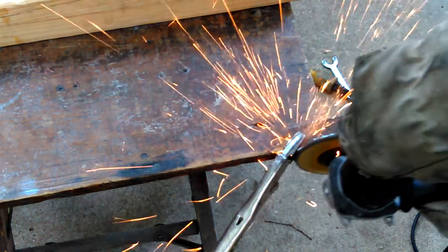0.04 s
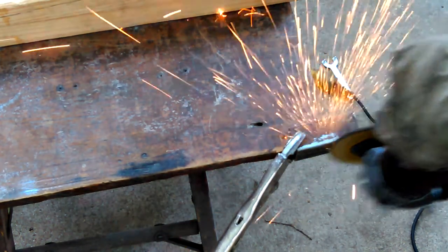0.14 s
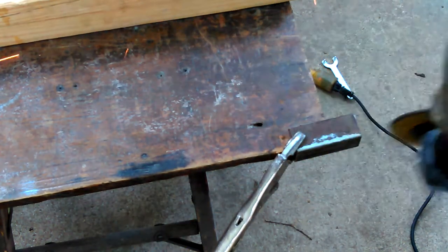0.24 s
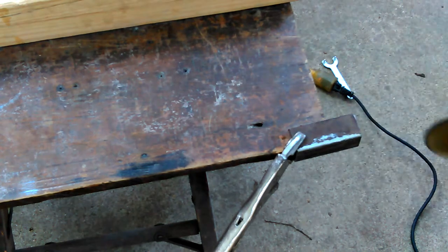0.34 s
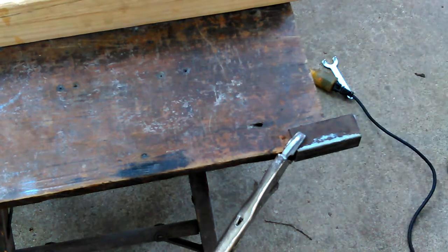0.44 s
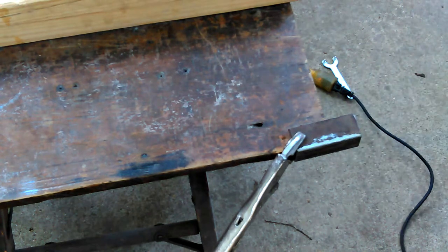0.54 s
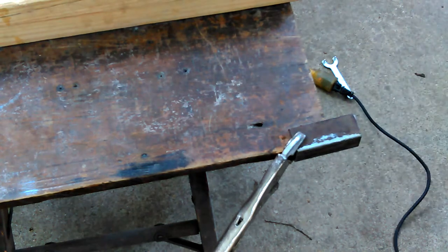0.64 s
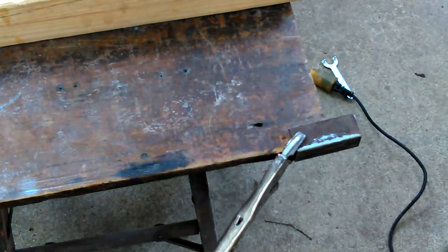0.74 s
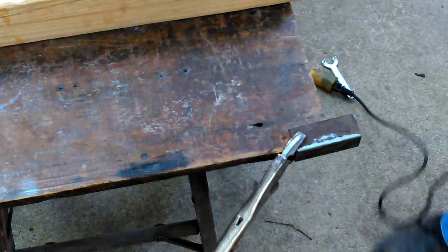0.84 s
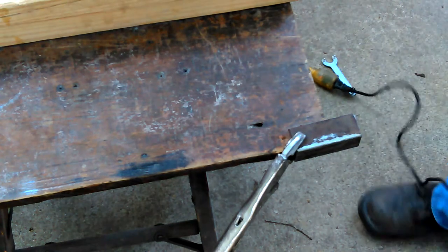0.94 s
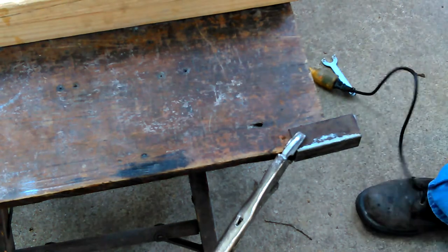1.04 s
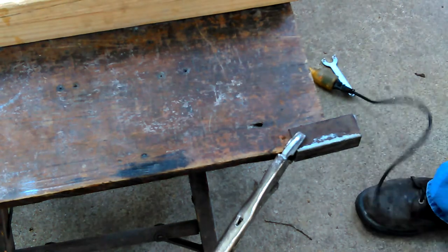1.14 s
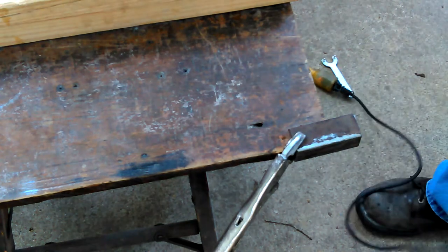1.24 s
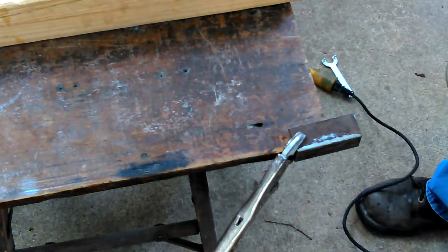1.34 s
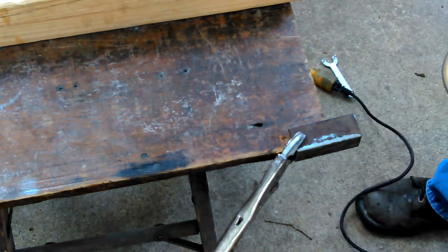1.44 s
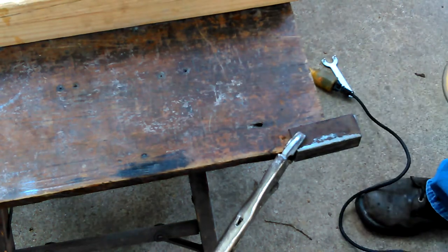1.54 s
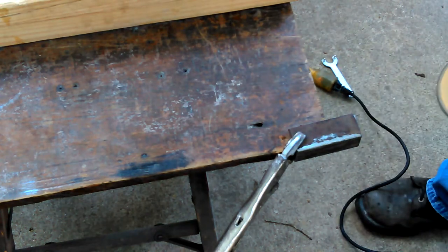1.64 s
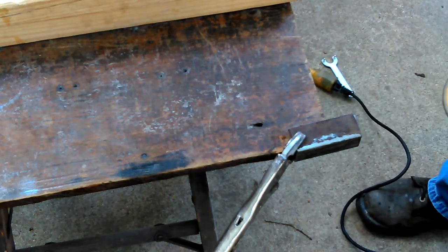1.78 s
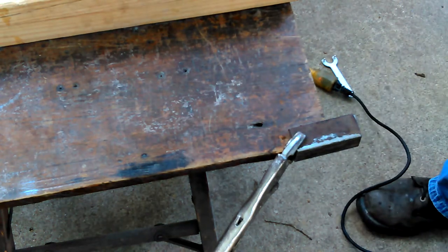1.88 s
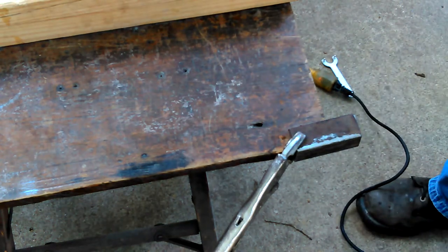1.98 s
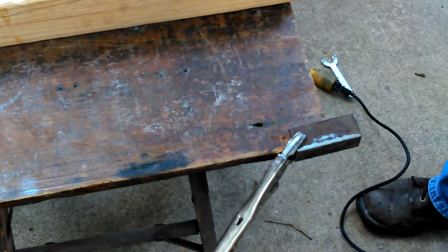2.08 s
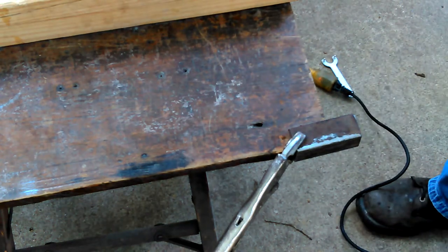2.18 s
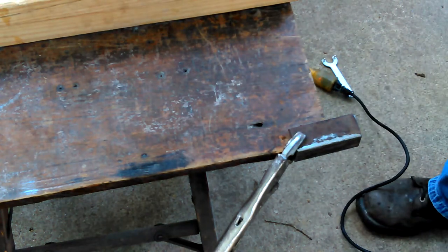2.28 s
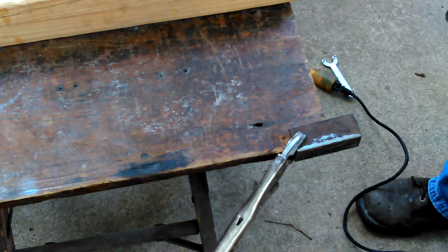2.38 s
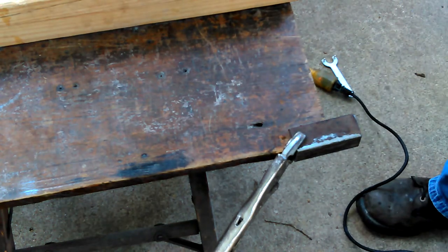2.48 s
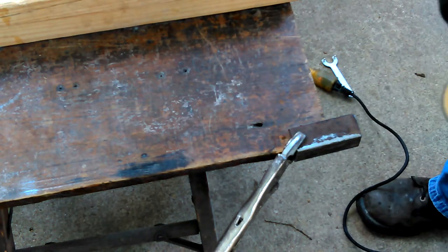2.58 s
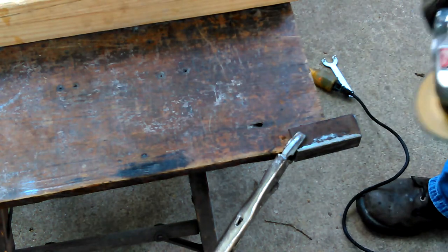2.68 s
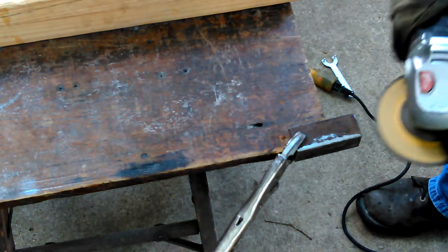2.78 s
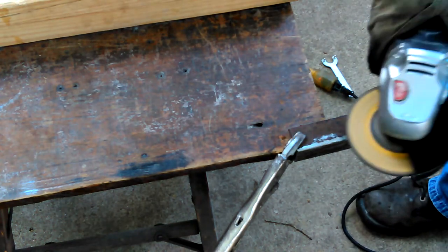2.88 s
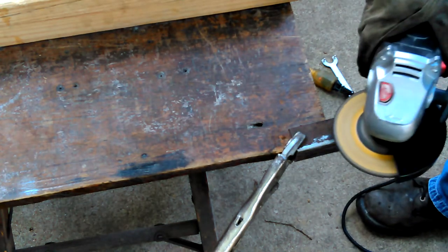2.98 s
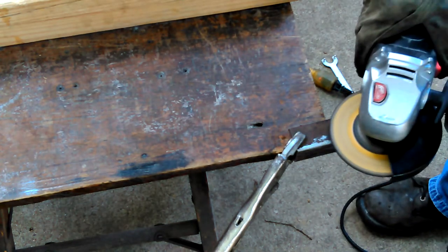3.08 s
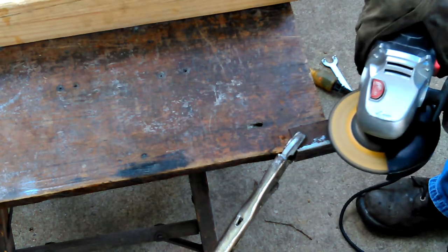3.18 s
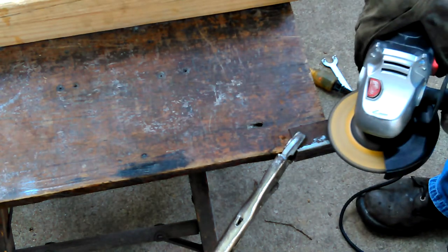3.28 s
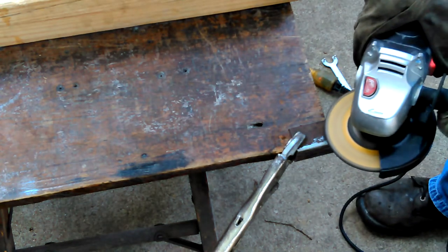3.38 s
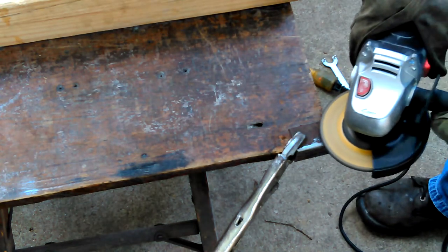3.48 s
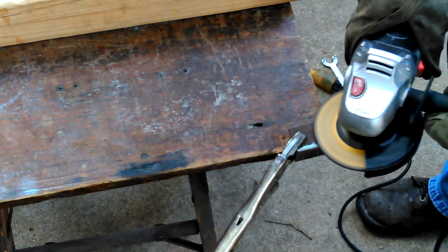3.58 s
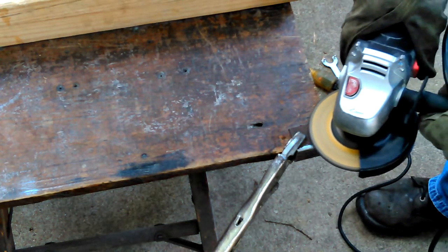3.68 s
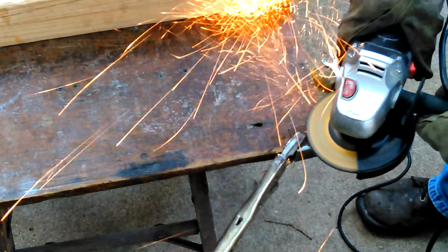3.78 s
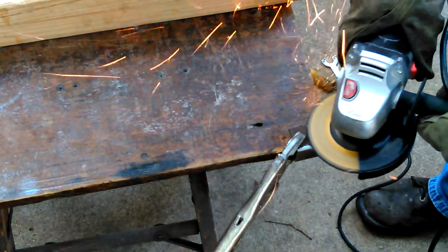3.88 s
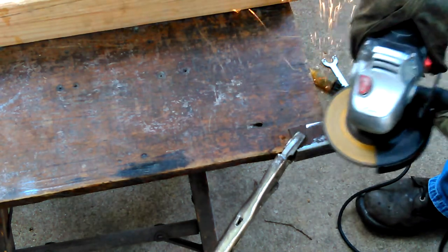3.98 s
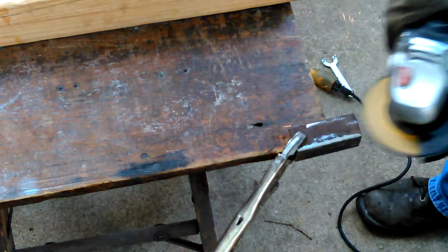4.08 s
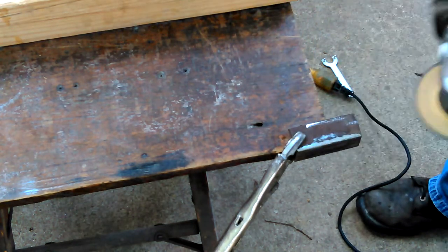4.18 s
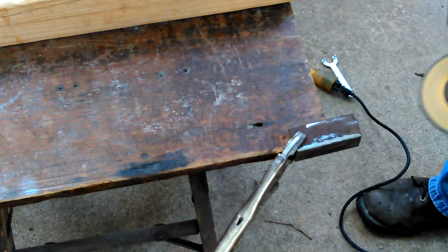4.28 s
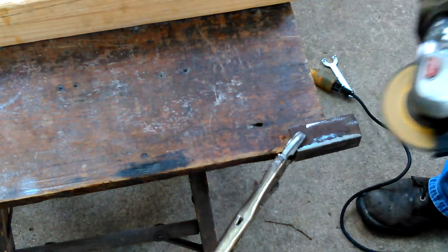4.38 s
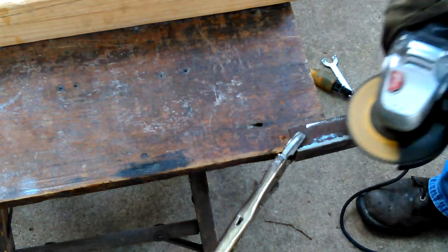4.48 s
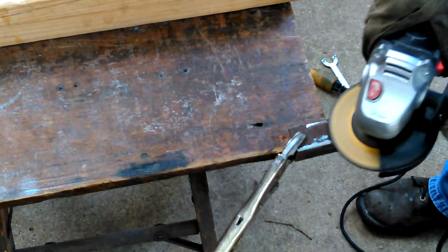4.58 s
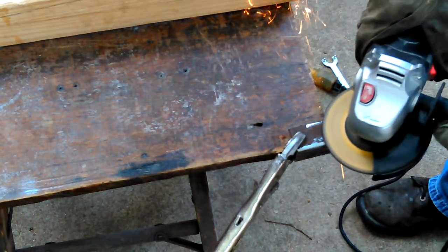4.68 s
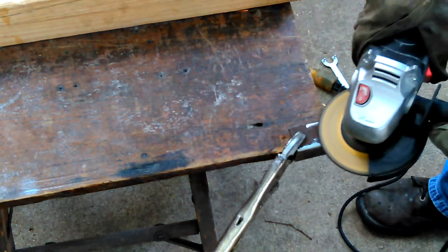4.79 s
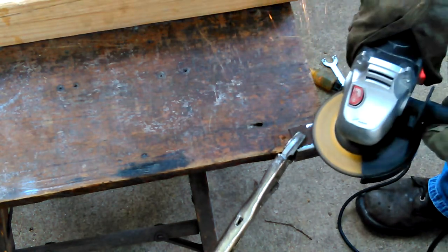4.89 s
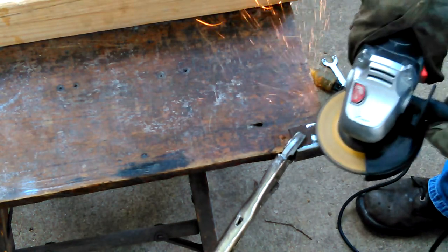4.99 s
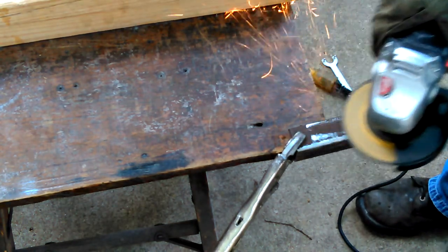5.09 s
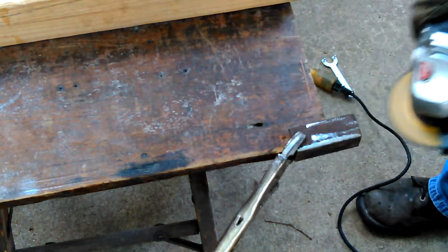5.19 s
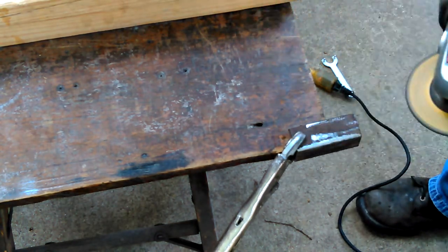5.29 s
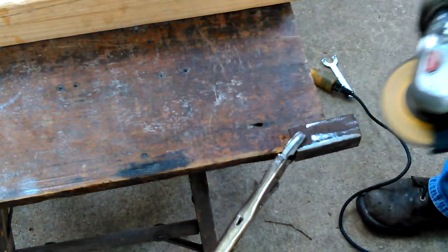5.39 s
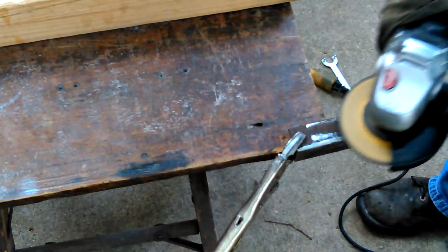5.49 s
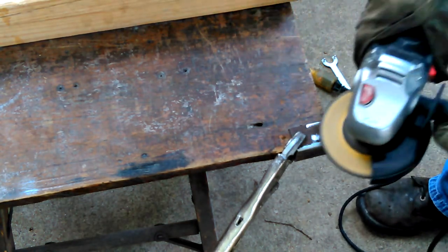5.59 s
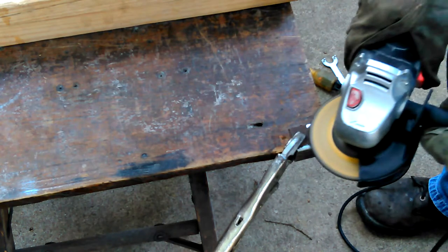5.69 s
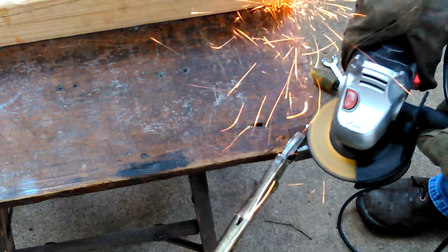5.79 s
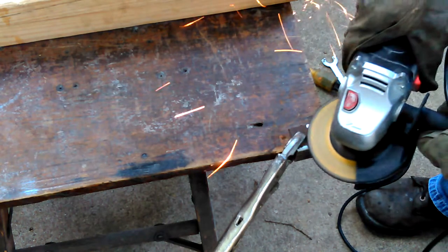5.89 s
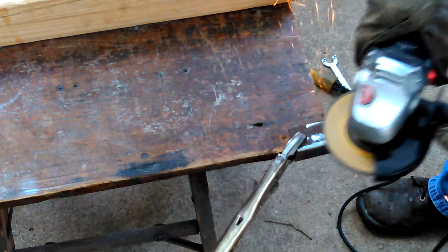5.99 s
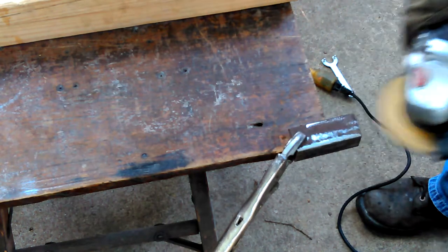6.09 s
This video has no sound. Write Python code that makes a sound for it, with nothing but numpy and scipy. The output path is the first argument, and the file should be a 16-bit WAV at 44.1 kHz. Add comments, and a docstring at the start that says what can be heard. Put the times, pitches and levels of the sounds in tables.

```python
"""Outdoors, beside a steel bench, an angle grinder whines and its fan hisses as its disc grinds a clamped bar.
At 1.3 s the switch is let go for a second: the gears coast and rattle, then the motor winds up again.
From 3.6 s the disc grinds the bar three more times; repeating grit and loose noise ring the bar's modes, some squeal.
Wind, in low noise and damped thumps, puffs on the microphone in this second half; a far engine hums throughout.
A patchy treble noise, opposite in left and right, fades under loud grinding; all else is central."""
import sys
import numpy as np
from scipy import signal
from scipy.fft import irfft
from scipy.io import wavfile

SR = 44100
rng = np.random.default_rng(int(sys.argv[2]) if len(sys.argv) > 2 else 0)


def wav_out(sig):
    """Save sig, one row per channel (or a flat mono array), as 16-bit PCM at SR to the path in sys.argv[1]."""
    wavfile.write(sys.argv[1], SR, np.round(np.clip(np.atleast_2d(sig).T, -1, 1) * 32767).astype(np.int16))


N = 270774

# level and shading of the fan hiss, and level of the whine, as the tool is turned about:
# time_s, hiss_db, boom_db (under 1.1 kHz, none over 1.6), body_db (under 2.3 kHz, none over 4.5),
# edge_db (over 9.2 kHz, none under 6.5), whine_db
TOOL_TURNED = [(0.1, -15, 1.5, -7, 4, -44.5), (0.32, -18, 0.5, -4.5, -3.5, -47),
               (0.55, -17.5, 1.5, -5.5, -3.5, -38), (0.75, -17.5, -4.5, -2, -2, -40.5),
               (1.03, -12.5, -3.5, -3.5, -2, -41), (1.43, -12, -5.5, -4, -3, -39),
               (1.89, -19.5, -5.5, -1, 1, -36), (2.05, -21.5, -4.5, 0, 2.5, -38),
               (2.4, -21, -2.5, -3, -0.5, -43), (2.7, -20, -5.5, -1, -3, -36.5),
               (2.89, -17, -2, -4, -2, -41), (3.08, -16.5, -4.5, -3.5, -2.5, -45),
               (3.55, -18, -2.5, -2, 0, -42), (4.2, -17, -3, -2, -4, -41.5), (4.65, -17, -4, -1.5, -1, -40),
               (5.25, -17.5, -4.5, -1.5, -3, -41.5), (6.14, -15.5, -3.5, -2.5, 0.5, -39.5)]
# colour of the hiss and of the patchy treble, relative levels: pitch_hz, level_db_per_hz
NOISE_COLOUR = [(350, -18.5), (600, -12), (703, -12), (761, -15.5), (1400, -6.5), (1520, -8.5), (2340, -7),
                (2860, -6.5), (3100, -7), (4790, -5), (6670, -4.5), (9160, -19.5), (14200, -24)]
# disc on bar, one table a pass from touch to lift:
# time_s, pressure_db, lean_to_low_modes_db, ring_near_7_khz_db
PASSES = [
    [(0.0, -13, 4, -9), (0.06, -16, 1, -6), (.11, -7, 2.5, -7), (0.15, 2, -2, -3), (0.22, -3, 2.5, 2.5),
     (0.274, 3, -0.5, 4.5), (0.287, -13, 4, -7)],
    [(3.595, -3, -3, -3), (3.66, 0, -2.5, -4.5), (3.8, 4, -6.5, -2), (3.88, 4.5, -4, 1.5),
     (4.01, 7, -2.5, 0.5), (4.07, 1, 4.5, 3.5), (4.145, 1.5, 3, 0.5), (4.158, -25, 0, -6)],
    [(4.69, 0, 2, 2.5), (4.76, -6.5, 1.7, 8), (4.85, -0.5, 2, -5), (4.96, 3, 1, -0.5), (5.05, 3.5, 0, 0),
     (5.1, 1.5, 1.5, 8.5), (5.18, 2, 4, -2), (5.2, -6, 6, -3)],
    [(5.795, -5, 1.5, -12), (5.9, -1.5, -1, -6), (5.96, -2, -7, -12), (6.03, 1.5, 1, -3), (6.08, 5, 0, -3),
     (6.14, 0, 1, -4)],
]
SWITCH_OFF_S, SWITCH_ON_S = 1.3, 2.39
DISC_PER_ARMATURE = 12 / 37   # gear ratio, twelve pinion teeth


def amp(db):
    """dB to gain."""
    return 10 ** (np.asarray(db) / 20)


def rms_one(x):
    """Scale to rms 1."""
    return x / np.sqrt(np.mean(x ** 2) + 1e-20)


def in_time(rows, outside=None):
    """Columns of a curve table at every sample; outside is the value beyond its ends."""
    time_s, *columns = np.transpose(rows)
    t = np.arange(N) / SR
    return [np.interp(t, time_s, column, outside, outside) for column in columns]


def drift(rate_hz):
    """Slow random wander of spread 1: noise smoothed by two equal poles, drawn every 40 samples."""
    pole = np.exp(-2 * np.pi * rate_hz * 40 / SR)
    white = rng.standard_normal(N // 40 + 2002)
    slow = signal.lfilter([1], [1, -2 * pole, pole * pole], white)[2000:]   # settled part
    return np.interp(np.arange(N) / 40, np.arange(len(slow)), rms_one(slow))


def resonate(x, modes):
    """Parallel resonances with alternating signs, together scaled to rms 1."""
    out = 0
    for k, (hz, width_hz, db) in enumerate(modes):
        r = np.exp(-np.pi * width_hz / SR)
        poles = [1, -2 * r * np.cos(2 * np.pi * hz / SR), r * r]
        out = out + (-1) ** k * amp(db) * signal.lfilter([1 - r * r, 0, r * r - 1], poles, x)
    return rms_one(out)


def coloured(spectrum, edges_hz, patchy_db, tilt, shared=0.61, rate_hz=12):
    """Noise in bands, each with its own level, flicker and moving tilt(hz) in dB."""
    out, power = 0, 0
    white = rng.standard_normal((2, N))
    together = drift(31)
    points_hz, points_db = np.transpose(spectrum)
    for k, (low, high) in enumerate(zip(edges_hz, edges_hz[1:])):
        sos = signal.butter(2, [low, high], "band", fs=SR, output="sos")
        band = signal.sosfilt(sos, white[k % 2])
        hz = np.sqrt(low * high)
        level = amp(np.interp(np.log(hz), np.log(points_hz), points_db))
        power += np.mean((level * band) ** 2)
        flicker_db = patchy_db * (shared * together + drift(rate_hz))
        out = out + level * band * amp(tilt(hz) + flicker_db)
    return out / np.sqrt(power)   # near rms 1 but for tilt and flicker


def speed():
    """Armature speed in Hz: it climbs toward free speed, passes drag it down, it coasts with the switch off."""
    free_hz, start_hz = 550.8, 537.8
    wind_up_s, coast_s = .48, 3.15   # time constants
    # load of each pass, growing from touch to lift: drag_at_touch_hz_per_s, drag_at_lift_hz_per_s
    drags = [(94.97, 135), (19.97, 100), (8.01, 150), (7.94, 55.3)]
    step_s = .002
    t = np.arange(0, N / SR + step_s, step_s)
    drag = 0
    for rows, (at_touch, at_lift) in zip(PASSES, drags):
        start_s, end_s = rows[0][0], rows[-1][0]
        done = (t - start_s) / (end_s - start_s)
        drag = drag + (at_touch + (at_lift - at_touch) * done ** 2) * (t >= start_s) * (t < end_s)
    hz = [start_hz]
    for s, pull in zip(t[1:], drag):
        if SWITCH_OFF_S < s < SWITCH_ON_S:
            change = -hz[-1] / coast_s
        else:
            change = (free_hz - hz[-1]) / wind_up_s - pull
        hz.append(hz[-1] + step_s * change)
    return np.interp(np.arange(N) / SR, t, hz)


def motor(turns):
    """Armature unbalance gives one tone, pinion teeth a wavering twelfth multiple, the disc a hum."""
    # tone of the twelve pinion teeth, heard as the drive lets go: time_s, level_db
    mesh = [(1.2, -60), (1.35, -29), (1.6, -27.5), (1.9, -36), (2.05, -60)]
    # hum of the disc at four times its speed: time_s, level_db
    disc_hum = [(0, -55), (.3, -48.5), (.9, -43), (1.2, -59), (1.4, -52), (6.14, -75)]
    whine_db = in_time(TOOL_TURNED)[-1] + 2.25 * drift(23)
    whine = amp(whine_db) * np.sin(2 * np.pi * turns)
    mesh_db = in_time(mesh, outside=-120)[0] + 5.7 * drift(39.0)
    teeth = amp(mesh_db) * np.sin(2 * np.pi * 12 * turns + 1.6 * drift(57))
    disc_db = in_time(disc_hum)[0] + 2.5 * drift(5)
    disc = amp(disc_db) * np.sin(2 * np.pi * 4 * DISC_PER_ARMATURE * turns)
    return np.sqrt(2) * (whine + teeth + disc)   # table levels are rms


def shading(hz):
    """Moving level in dB at one pitch as the tool is turned: low, middle and high parts differ."""
    _, boom_db, body_db, edge_db, _ = in_time(TOOL_TURNED)
    boom = boom_db * np.clip(2 * np.log2(1600 / hz), 0, 1)
    body = body_db * np.clip(np.log2(4500 / hz), 0, 1)
    edge = edge_db * np.clip(2 * np.log2(hz / 6500), 0, 1)
    return boom + body + edge


def hiss():
    """Air through the vents; the housing shades low and high parts differently as it turns."""
    air = coloured(NOISE_COLOUR, np.geomspace(300, 15000, 21), patchy_db=1.0, tilt=shading)
    return amp(in_time(TOOL_TURNED)[0]) * air


def patchy_treble(fading):
    """Strongly flickering treble noise, opposite in left and right, that follows the level of the hiss."""
    lower_edge_hz, level_db = 4730, -13.5   # level is over the hiss

    def tilt(hz):
        return shading(hz) + 4.1 * np.log2(hz / 6000)

    noise = coloured(NOISE_COLOUR, np.geomspace(4000, 15000, 8), patchy_db=7.0, tilt=tilt,
                     shared=0.79, rate_hz=7.0)
    highpass = signal.cheby2(8, 60, 0.91 * lower_edge_hz, "high", fs=SR, output="sos")
    treble = amp(level_db) * fading * signal.sosfilt(highpass, noise)
    return amp(in_time(TOOL_TURNED)[0]) * treble * [[1], [-1]]


def rattle():
    """Clumped knocks of tooth on tooth ring the gear housing while the drive has play."""
    # coasting rattle, lowest housing mode then upper modes: jolt_at_let_go_db, steady_db, fade_db_per_s
    levels = [(-34, -26, 4), (-21, -21, 3.5)]
    # housing modes in the same two groups, relative levels: pitch_hz, width_hz, level_db
    gearbox = [
        [(1945, 63, 11), (1860, 160, -11)],
        [(2750, 240, 1.5), (3220, 72, 12), (3550, 43, 11), (4840, 87, 7), (5500, 900, 2.5), (6100, 220, -10)],
    ]
    jolt_s, take_up_s = 0.022, 0.052   # the jolt dies, the drive takes up the play again
    sizes = amp(4.1 * np.minimum(rng.exponential(1, N), 5)) * rng.choice([-1, 1], N)
    knocks_per_s = 3000 * amp(3 * drift(80))
    knocks = sizes * (rng.random(N) < knocks_per_s / SR) + 1e-18
    t = np.arange(N) / SR
    since = t - SWITCH_OFF_S
    loosening = np.clip(since / take_up_s, 0, 1)
    loose = loosening * np.exp(-np.maximum(t - SWITCH_ON_S, 0) / take_up_s)
    jolt = np.exp(-np.abs(since - take_up_s) / jolt_s)
    out = 0
    for (jolt_db, steady_db, fade_db), modes in zip(levels, gearbox):
        level = amp(jolt_db) * jolt + amp(steady_db - fade_db * since)
        out = out + level * resonate(knocks, modes)
    return loose * out


def contact():
    """Gain of each group of bar modes; the touch comes and goes over some ms."""
    # each group of bar modes: level_db at 0 dB controls, then the dB it follows
    # per_db_of_pressure, per_db_of_lean, per_db_of_7_khz_ring
    response = [(-35, 0.24, 2, 0.27), (-36.5, 1.65, 1.2, -0.027), (-25, 1.6, 0.2, 0.63),
                (-23.5, 0.82, -0.3, 0.18), (-24, 1.96, 0.66, 0.82), (-20.5, -0.08, -0.4, 0.73),
                (-25, 1, -0.13, 0.22), (-31, 0.83, 0.6, 0.39)]
    # the disc meets the bar at its own angle, one row a pass: added_db for each group of modes
    angle = [(5.5, -1, -.5, 1.5, .3, .3, -1.7, -3.5), (-0.5, 0, -2, 0.12, -1.4, .3, 1.1, 1.5),
             (0, .5, -4, 0.49, -0.88, -.3, -0.51, -1), (1.5, -1, -3, 0.13, .3, .3, -0.024, 2)]
    base_db, *follows = np.transpose(response)
    controls = sum(np.array(in_time(rows, outside=0)) for rows in PASSES)
    t = np.arange(N) / SR
    touching = 0
    for rows, added_db in zip(PASSES, angle):
        during = (t >= rows[0][0]) * (t < rows[-1][0])
        touching = touching + amp(added_db)[:, None] * during
    touch = touching * amp(base_db[:, None] + np.transpose(follows) @ controls)
    return signal.lfilter([.004], [1, -.996], touch + 1e-18, axis=1)


def disc_face(turns, wear, uneven_db, points=512):
    """Grit passes the bar once a turn, slowly wearing, so lines stand at multiples of the disc speed."""
    count, top = 200 * (N // SR + 2), 88   # turns drawn, number of multiples
    fine = .5 + np.arange(top) / 35   # fine grit changes faster than the broad shape
    steps = wear * fine * rng.standard_normal((count, top))
    phase = rng.uniform(0, 2 * np.pi, top) + np.cumsum(steps, axis=0)
    wander = signal.lfilter([.4], [1, -.92], rng.standard_normal((count, top)), axis=0)
    size_db = uneven_db * fine * wander
    face = irfft(amp(size_db) * np.exp(1j * phase), points, axis=1).ravel()
    return rms_one(np.interp(turns * points, np.arange(len(face)), face))


def grinding(touch, turns):
    """The repeating grit plus loose noise drive the bar modes while the disc touches."""
    # bar and disc modes, in groups near 1.9, 2.1, 3.9, 5, 6, 7.3, 10 and 12 kHz, relative levels:
    # pitch_hz, width_hz, level_db
    bar_modes = [
        [(1400, 420, -7.5), (1683, 90, 0.5), (1917, 340, 1.5)],
        [(2090, 36, 0)],
        [(3380, 120, -7.5), (3846, 25, 3), (4010, 76, -5)],
        [(4370, 210, -6), (4870, 150, 5), (5184, 136, 7)],
        [(5470, 53, 2.5), (5940, 300, -2.5), (6120, 94, -3), (6450, 82, 1)],
        [(7225, 130, 3), (7610, 140, -1.5)],
        [(8430, 130, -1.5), (9790, 420, 0.5), (10230, 110, -2.5), (10360, 60, -2)],
        [(11500, 86, 3.5), (12500, 160, 1), (13200, 760, -8)],
    ]
    wobble_db = -38.5   # disc run-out heard as one push a turn, peak at the strongest touch
    face = disc_face(turns, wear=.11, uneven_db=1.6)
    loose = .4 * rng.standard_normal(N)
    once_a_turn = np.sin(2 * np.pi * turns)
    force = (face + loose) * (1 + 0.41 * once_a_turn)   # harder on the high side of the disc
    rings = 0
    for level, modes in zip(touch, bar_modes):
        rings = rings + level * amp(1.64 * drift(29)) * resonate(force, modes)
    near_10_khz = touch[-2]
    return rings + amp(wobble_db) * near_10_khz / near_10_khz.max() * once_a_turn


def squeals(turns):
    """A mode locks onto the nearest multiple of the disc speed: a wavering tone swells, holds and stops."""
    # squeals, each swelling just ahead of its start: start_s, length_s, mode_hz, level_db (rms)
    locked = [(0.0, 0.11, 1900, -25.5), (0.0, 0.094, 5040, -25), (.17, 0.098, 5190, -25),
              (0.228, 0.07, 3850, -22.5), (3.61, .2, 4900, -24), (3.687, 0.31, 3850, -27.5),
              (3.822, 0.13, 9970, -19.5), (4.698, .1, 7240, -28), (4.92, 0.15, 5100, -21.5),
              (5.002, 0.125, 5450, -22), (6.043, .09, 5470, -25), (6.11, 0.034, 3870, -20.5)]
    edge_s = 0.0097
    t, out = np.arange(N) / SR, 0
    disc_hz = np.gradient(turns) * SR
    for s, length, mode_hz, db in locked:
        shape = np.clip(np.minimum(t - s + edge_s, s + length - t) / edge_s, 0, 1)
        multiple = np.round(mode_hz / disc_hz[int(s * SR)])
        tone = np.sin(2 * np.pi * multiple * turns + 0.57 * drift(27))
        out = out + shape * amp(db + 2.7 * drift(20)) * tone
    return np.sqrt(2) * out


def wind():
    """Lumpy low noise on the microphone; stronger puffs reach higher."""
    # gusts on the microphone: centre_s, level_db, half_length_s
    gust_rows = [(3.47, -45, .02), (3.54, -38, .015), (3.697, -50.5, .03), (4.527, -41, 0.035),
                 (4.765, -36, 0.13), (4.983, -31, 0.047), (5.108, -34, 0.027), (5.5, -40, 0.1),
                 (5.744, -43, .03), (5.88, -34, 0.042), (6.047, -36.5, .03), (6.14, -28, 0.037)]
    # breeze between gusts: time_s, level_db
    breeze = [(3.2, -54), (4.35, -68), (4.5, -46.5), (6.14, -44.5)]
    t = np.arange(N) / SR
    gusts = sum(amp(db) * np.exp(-((t - s) / half) ** 2) for s, db, half in gust_rows)
    blowing = gusts + amp(in_time(breeze, outside=-90)[0])
    level_db = 20 * np.log10(blowing) + 2.2 * drift(8.7)
    white = rng.standard_normal((2, N))
    low_band = signal.butter(2, [25, 65], "band", fs=SR, output="sos")
    puff_band = signal.butter(2, [70, 150], "band", fs=SR, output="sos")
    low = rms_one(signal.sosfilt(low_band, white[0]))
    puff = rms_one(signal.sosfilt(puff_band, white[1]))
    return amp(level_db) * (low + amp(0.35 * (level_db + 24.5)) * puff)


def thumps():
    """Each sharp puff on the port pushes the membrane, which swings and dies away."""
    # sharp puffs: start_s, level_db (before decay and softening), pitch_hz
    puffs = [(4.724, -18, 119), (4.784, -29, 100), (4.955, -30, 90), (4.98, -17, 142), (5.866, -21, 70),
             (6.13, -20, 90)]
    out = np.zeros(N)
    for s, db, hz in puffs:
        first = int(s * SR)
        t = np.arange(min(int(.06 * SR), N - first)) / SR
        swing = np.sin(2 * np.pi * hz * t) * np.exp(-t / 0.008)
        out[first:first + len(t)] -= amp(db) * swing
    return signal.lfilter([.06], [1, -.94], out)   # softens the onset


def yard():
    """Low outdoor rumble and a far engine whose tones waver."""
    # far engine tones: pitch_hz, level_db (peak)
    hum_tones = [(105, -53.5), (140, -49), (242, -61)]
    # colour of the rumble, relative levels: pitch_hz, level_db_per_hz
    rumble_colour = [(12, -33), (20, 3), (48, 7.5), (87, -8), (119, 0.5), (222, -4.5), (305, -5),
                     (515, -13), (900, -4), (1170, -34), (1980, -120)]
    rumble_db = -47.5
    t, hum = np.arange(N) / SR, 0
    for hz, db in hum_tones:
        hum = hum + amp(db + 2.5 * drift(2)) * np.sin(2 * np.pi * hz * t + .7 * drift(3))
    rumble = coloured(rumble_colour, np.geomspace(18, 400, 8), patchy_db=1.5, tilt=lambda hz: 0)
    return hum + amp(rumble_db) * rumble


def scene():
    """A patchy treble, opposite in left and right, fades under loud grinding; all else is central."""
    halves_db = -32.5   # gain of the 10 kHz bar modes that halves the patchy treble
    touch = contact()
    turns = np.cumsum(speed()) / SR
    disc_turns = turns * DISC_PER_ARMATURE
    fading = 1 / (1 + (touch[-2] / amp(halves_db)) ** 2)
    tool = hiss() + motor(turns) + rattle()
    bar = grinding(touch, disc_turns) + squeals(disc_turns)
    return tool + patchy_treble(fading) + bar + wind() + thumps() + yard()


def record(dry):
    """Peaks clip at full scale, then a steep filter cuts the top above 14.3 kHz."""
    cut = signal.ellip(16, .5, 75, 14300, fs=SR, output="sos")
    return signal.sosfilt(cut, np.clip(dry, -1, 1))


dry = scene()
out = record(dry)
wav_out(out)
```